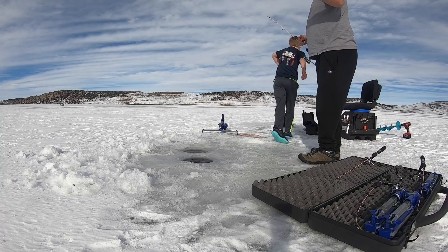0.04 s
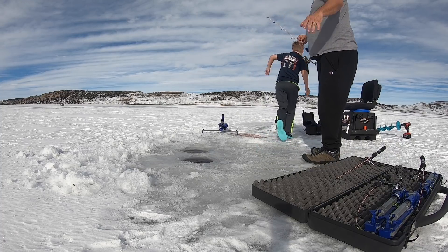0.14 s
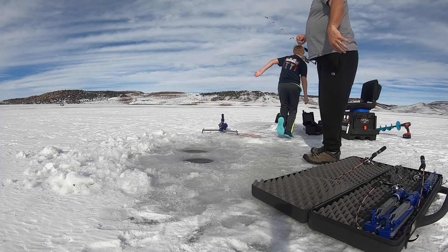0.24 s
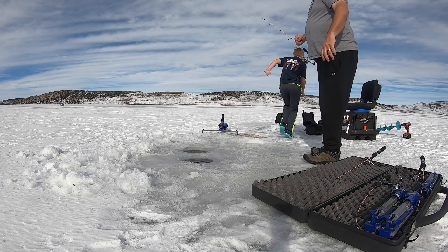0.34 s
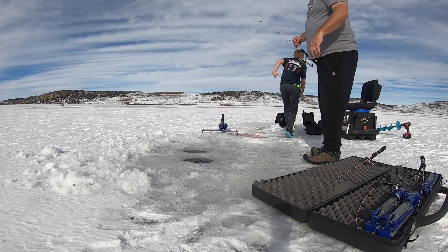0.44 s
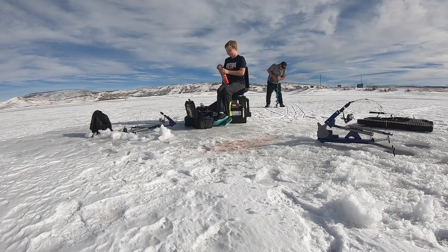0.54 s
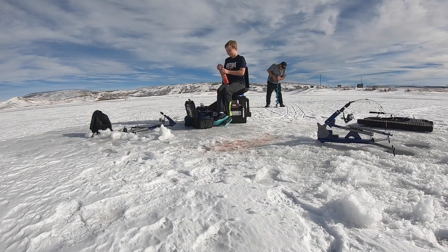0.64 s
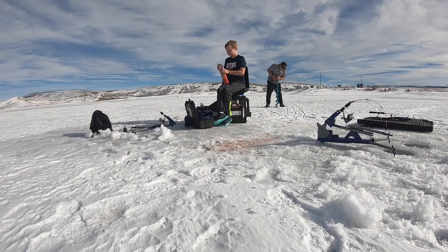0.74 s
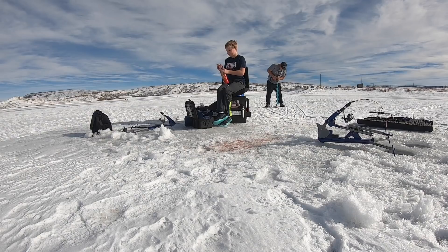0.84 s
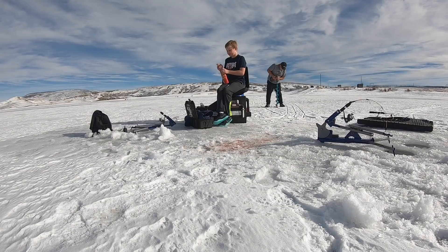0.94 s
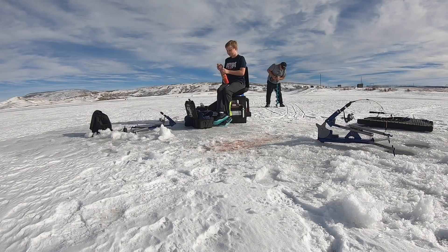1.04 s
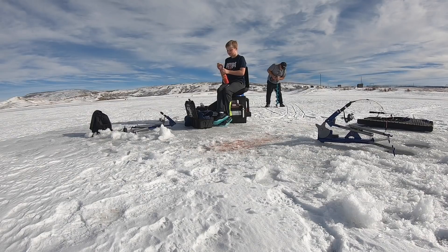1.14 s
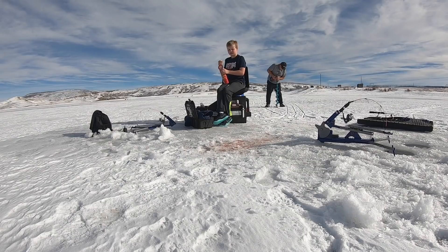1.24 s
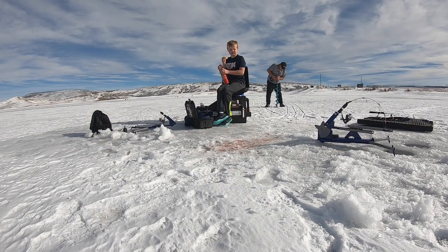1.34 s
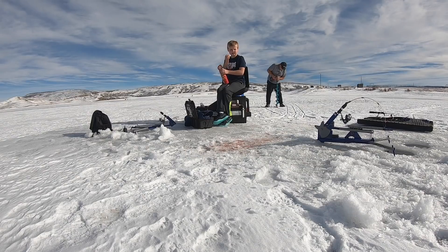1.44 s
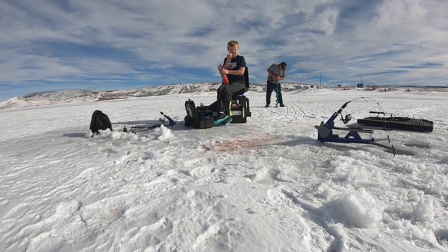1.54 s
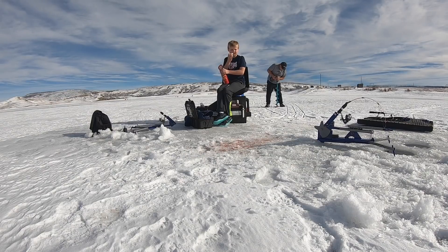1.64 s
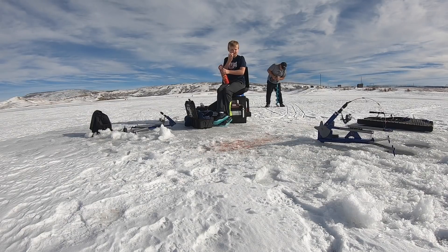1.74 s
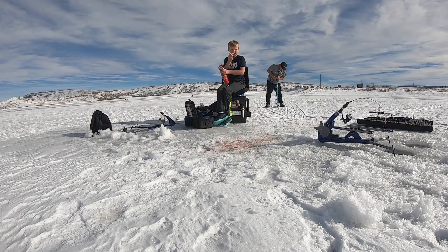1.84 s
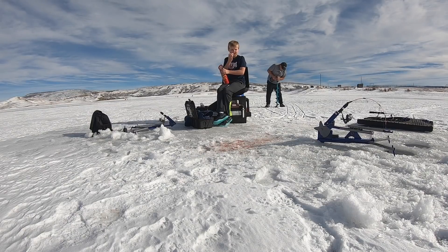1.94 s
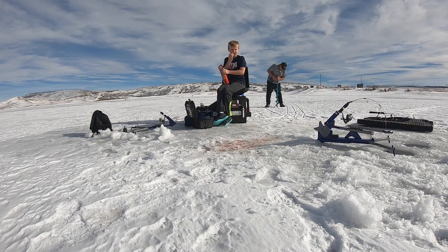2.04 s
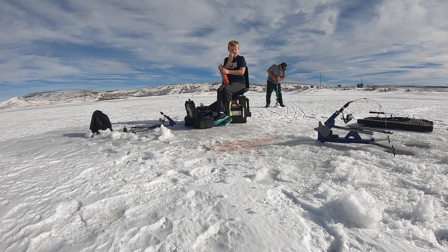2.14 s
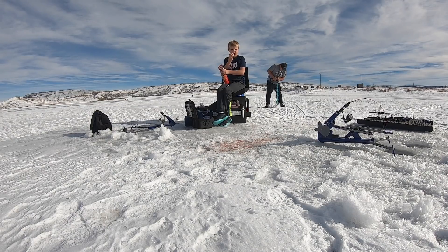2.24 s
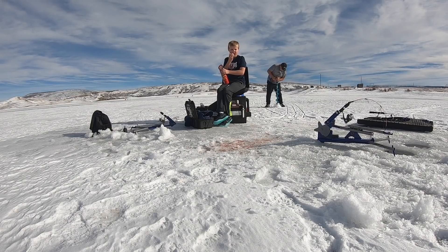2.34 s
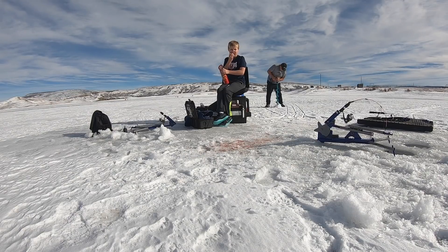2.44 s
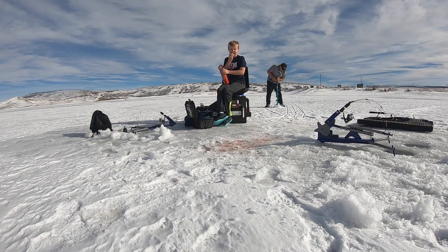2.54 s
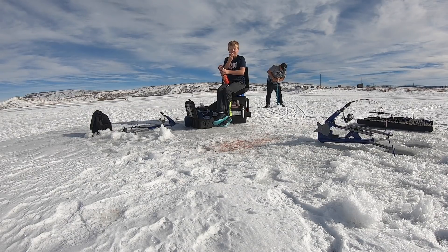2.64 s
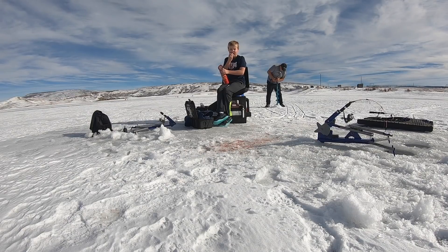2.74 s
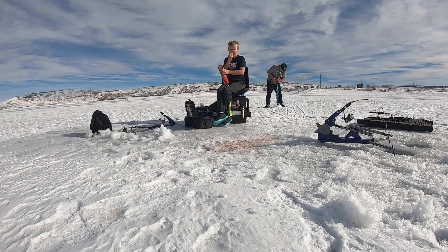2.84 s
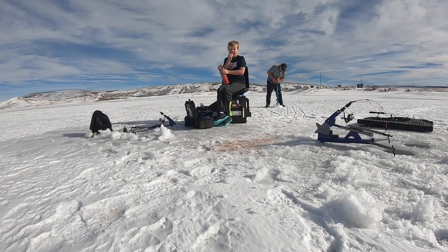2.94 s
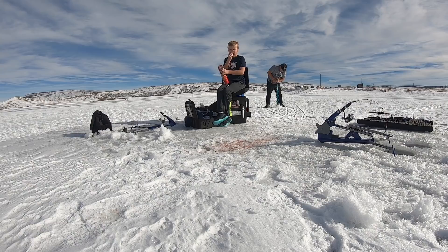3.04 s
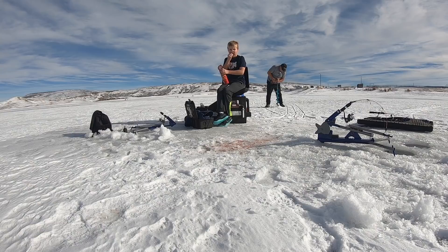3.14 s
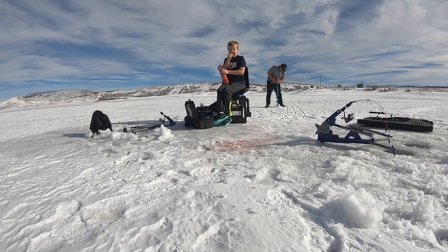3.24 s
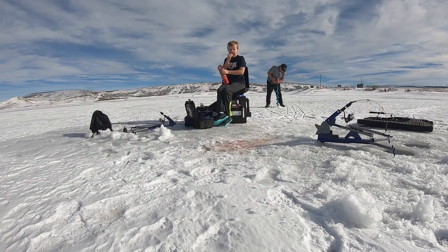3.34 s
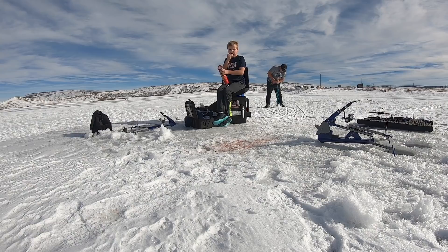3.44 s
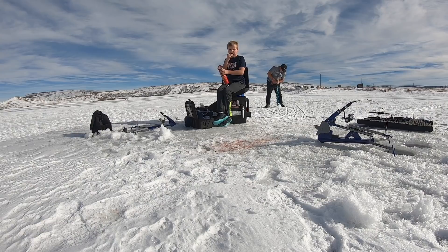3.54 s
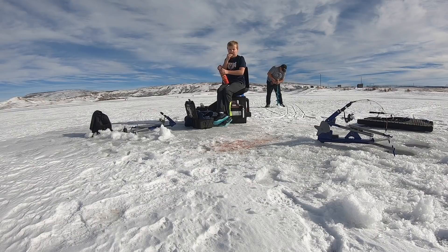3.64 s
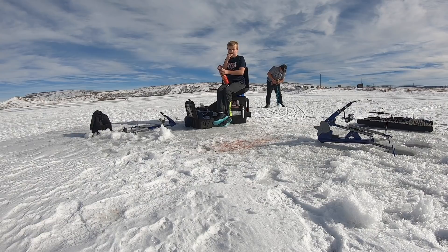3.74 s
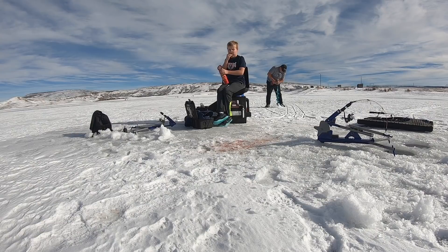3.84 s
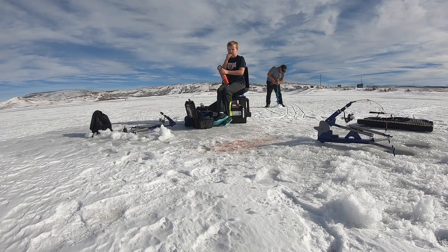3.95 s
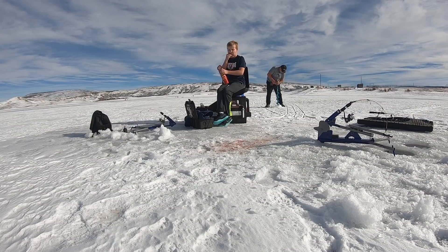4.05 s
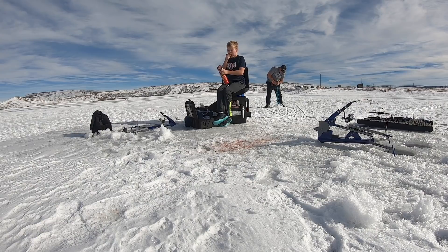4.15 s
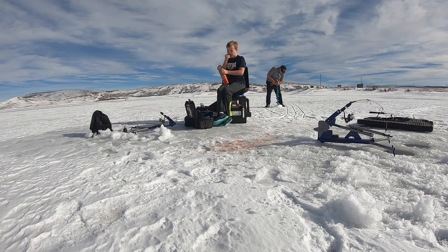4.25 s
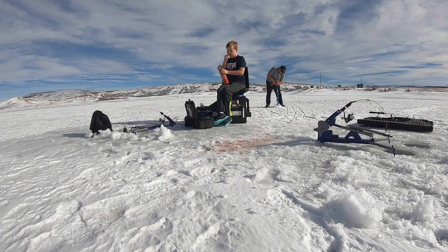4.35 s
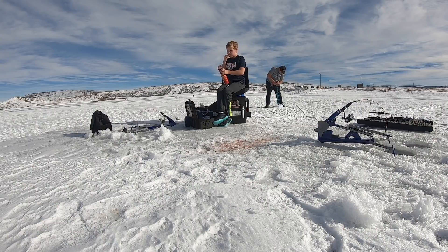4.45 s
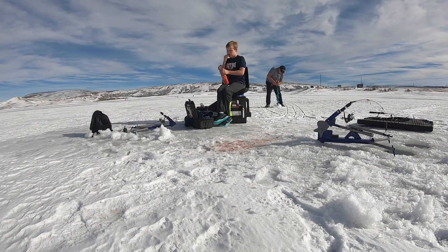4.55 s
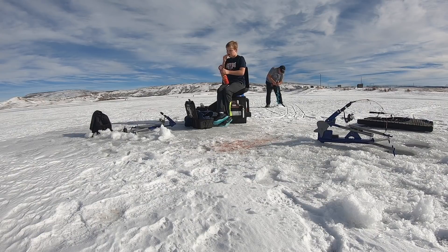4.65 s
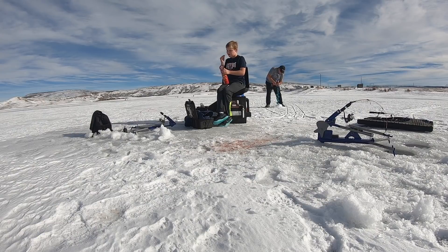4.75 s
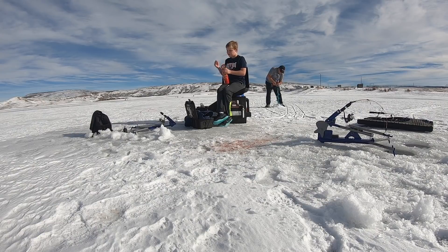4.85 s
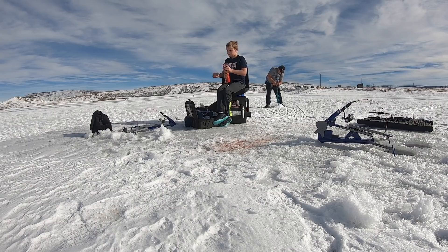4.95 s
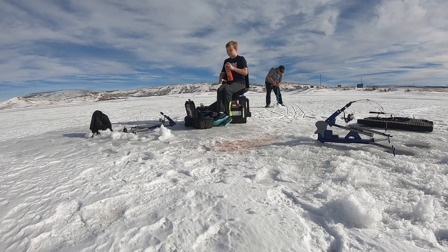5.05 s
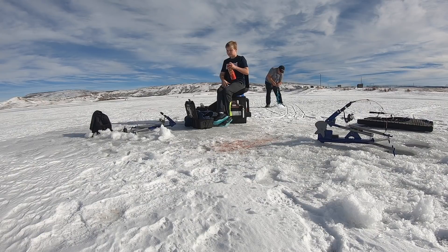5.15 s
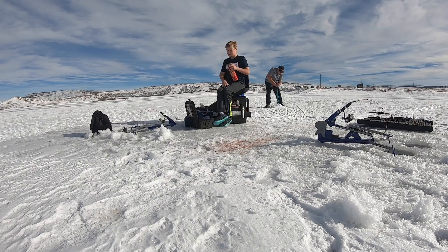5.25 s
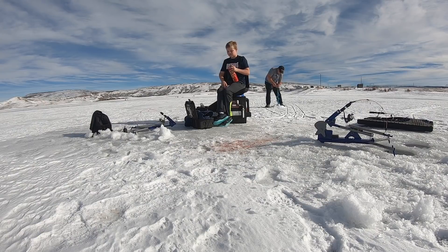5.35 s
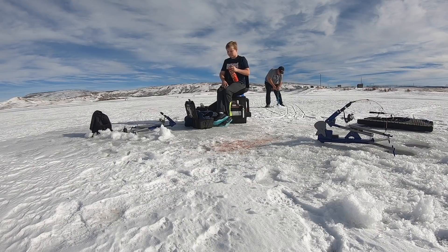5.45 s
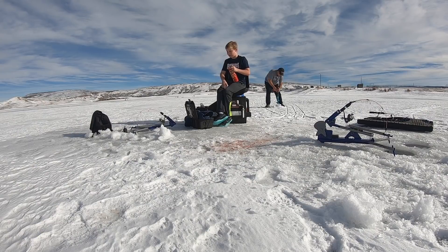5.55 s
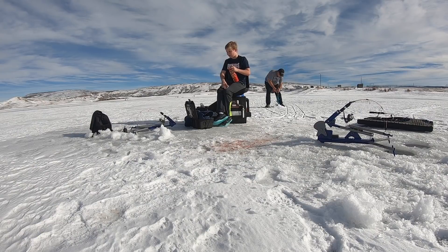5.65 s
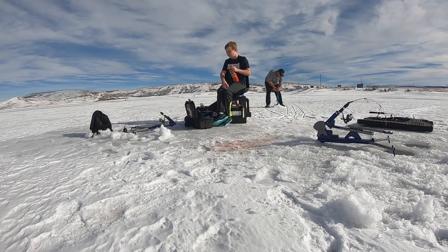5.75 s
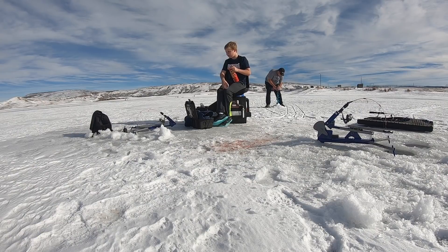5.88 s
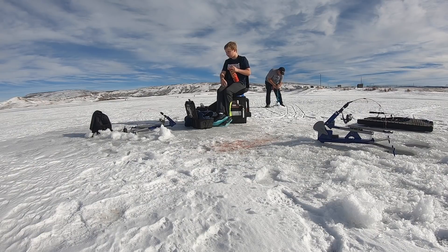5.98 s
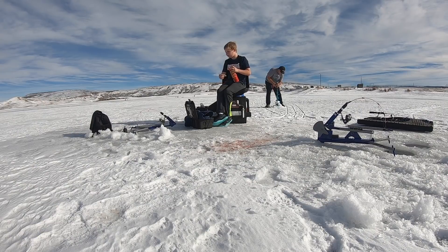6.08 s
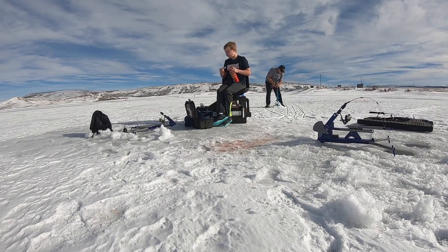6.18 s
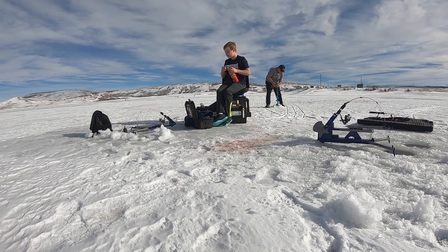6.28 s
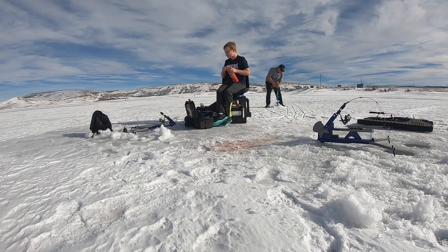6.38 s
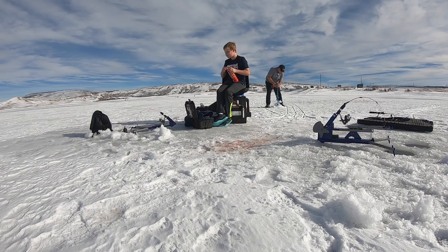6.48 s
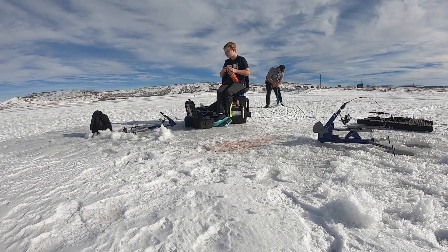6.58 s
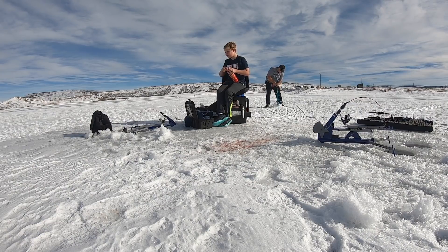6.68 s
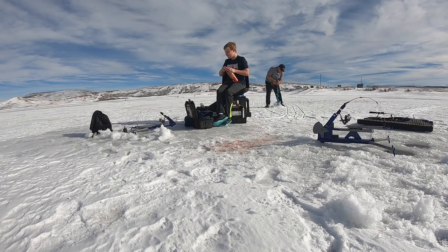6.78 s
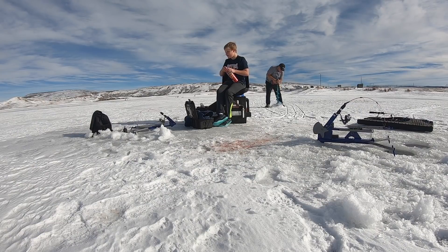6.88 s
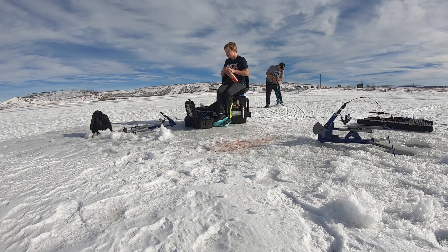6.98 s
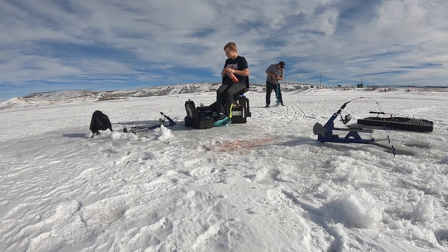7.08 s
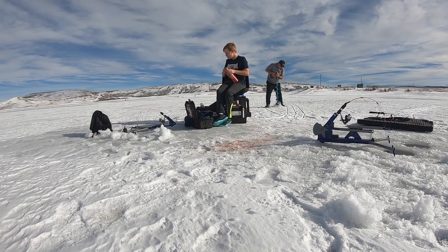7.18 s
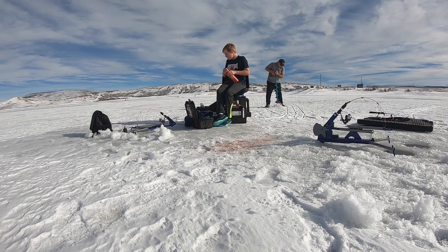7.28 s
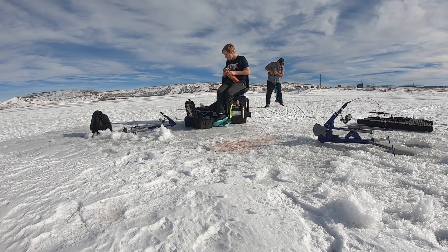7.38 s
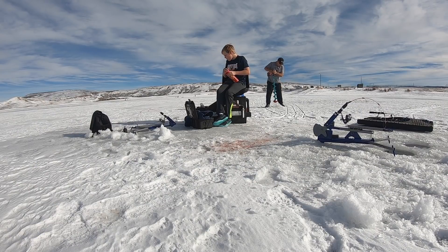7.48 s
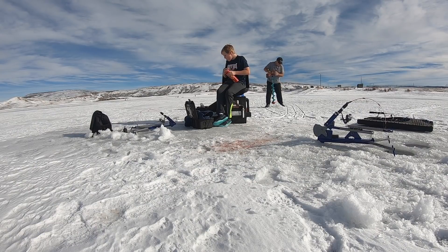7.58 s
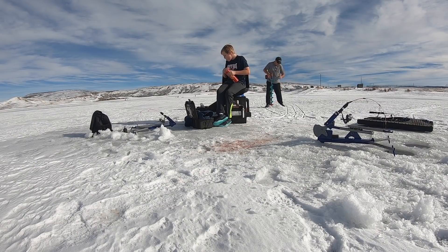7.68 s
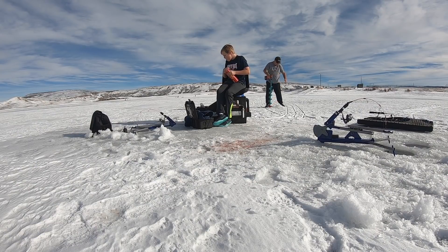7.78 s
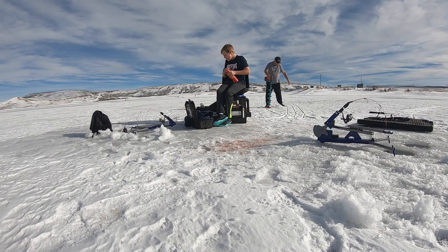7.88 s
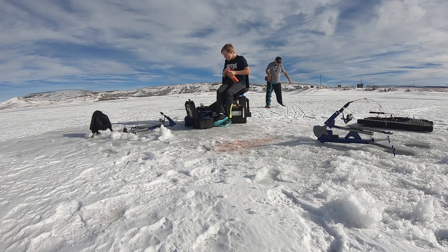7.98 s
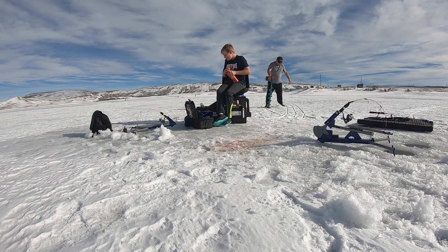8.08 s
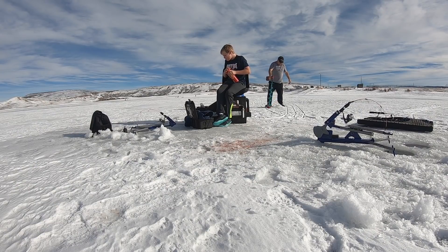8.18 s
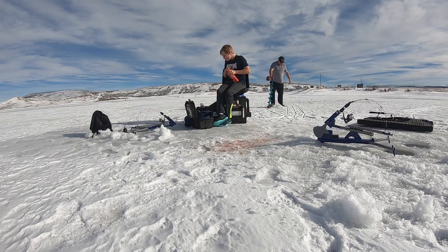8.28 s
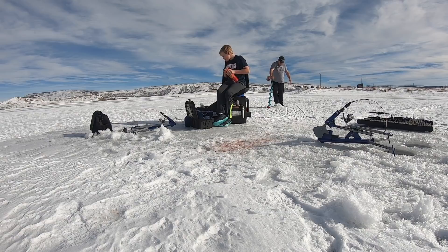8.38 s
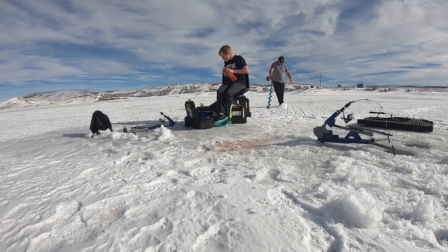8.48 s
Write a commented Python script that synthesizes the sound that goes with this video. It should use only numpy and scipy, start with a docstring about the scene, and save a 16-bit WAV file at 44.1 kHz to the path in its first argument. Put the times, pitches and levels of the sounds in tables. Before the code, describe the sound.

A drill-driven ice auger rises to a loud, rasping whine, breaks through, brakes sharply, then gives one short watery burst before quiet scuffs in light wind.

```python
"""A frozen lake in light wind: boots crunch on crusted snow, then a cordless drill turns an ice auger.
Shaft orders of motor and gears whine through the shell's resonances while shaped noise grains shave ice;
a bright hiss fades as the drilling deepens, the blades break through, the motor brakes and its lock clacks.
A second, short burst churns slush and water: gliding sines glug, then the motor winds down.
Decaying knocks, grainy scuffs and soft rubs follow, over filtered noise for the open air."""
import sys
import numpy as np
from scipy import signal
from scipy.fft import rfft, irfft, next_fast_len
from scipy.io import wavfile
from scipy.ndimage import uniform_filter1d

SR = 44100
rng = np.random.default_rng(int(sys.argv[2]) if len(sys.argv) > 2 else 0)


def dump_mix(stems):
    """Bounce the given channels to the path in sys.argv[1] as a 16-bit WAV at rate SR."""
    frames = np.atleast_2d(stems).T  # one column per channel
    limited = np.clip(frames, -1, 1)  # hard clip at full scale
    pcm = np.round(limited * 32767).astype(np.int16)
    wavfile.write(sys.argv[1], SR, pcm)


N = 375713
T = np.arange(N) / SR  # time in seconds
FREQS = np.maximum(np.fft.rfftfreq(N, 1 / SR), 1)

# Motor speed while drilling the hole. Each row: time in s, shaft speed in turns per second (Hz).
DRILLING = [(1.49, 40), (1.53, 60), (1.78, 59), (1.85, 88), (1.88, 104), (1.9, 119), (1.94, 160),
            (1.975, 186), (2.03, 185), (2.06, 201), (2.08, 219), (2.13, 288), (2.17, 311), (2.22, 320),
            (2.58, 318), (2.76, 386), (3.35, 373), (3.55, 408), (3.9, 416), (4.83, 411), (4.92, 420),
            (5.04, 411), (5.11, 427), (5.26, 422), (5.37, 433), (5.415, 378), (5.475, 414), (5.575, 414),
            (5.625, 378), (5.655, 268), (5.677, 180), (5.71, 60)]
# Motor speed while clearing the hole. Each row: time in s, shaft speed in turns per second (Hz).
CLEARING = [(6.345, 60), (6.383, 170), (6.395, 226), (6.405, 275), (6.418, 360), (6.45, 384), (6.5, 406),
            (6.54, 400), (6.58, 362), (6.75, 325), (6.8, 295), (6.85, 272), (6.93, 204), (7.0, 165),
            (7.05, 140), (7.13, 122), (7.47, 35)]
FULL_HZ = 400  # full motor speed
SINK_S, SINK_TIME_S, THROUGH_S = 2.86, 0.93, 5.41  # blades sink in, time constant of depth, break through
BREAK_DB, BREAK_LENGTH_S = 4, 0.015  # surge as the last ice gives way
UNLOAD_S = 0.04  # the load falls off this long before the blades are through
SLUSH_LOAD = 0.45  # load on the motor in slush, as a share of that in solid ice

# Tones of rotor, cogging and gear mesh.
# Each row: multiple of the shaft rate, gain in dB running free, gain in dB under load.
ORDERS = [(1, 1, -19), (2, -9, -17), (4, -3.5, -12), (8, -4, -15), (9, -21, 0), (13, 0, 2.5), (16, -5, -8),
          (18, -14, -9), (24, -5, 2), (48, -10, 4)]
# Resonances of the drill's shell. Each row: centre in Hz, width in Hz, gain in dB.
HOUSING = [(2930, 300, 15), (3930, 420, 11)]
# Shell resonance that fades under load. One row: centre in Hz, width in Hz, gain in dB.
FREE_RING = (5380, 250, 9)
# Pass band of the shell. One row: lower corner in Hz, upper corner in Hz.
SHELL_BAND_HZ = (250, 5200)
FINE_ORDER, FINE_TOP_HZ = 20, 3800  # orders above this one fade out past this frequency
BRAKE_DB, BRAKE_HZ_PER_S, BRAKE_ORDER = -13, 2000, 8  # fast slowing weakens every order but the cogging
# A change of speed drives the shell harder around this centre; a hard start adds a kick.
STRAIN_DB, STRAIN_HZ_PER_S, STRAIN_CENTRE_HZ, STRAIN_WIDTH_HZ = 13, 950, 2700, 1200
KICK_DB, KICK_HZ_PER_S = 9, 4800
# Hard grinding in the ice. One row: onset in s, full in s, easing in s, gone in s.
GRIND_S = (2.64, 2.85, 4.1, 4.85)
# Loading by the slush. One row: onset in s, full in s, easing in s, gone in s.
PLUNGE_S = (6.54, 6.6, 6.74, 6.8)
GRIND_DB, GRIND_JITTER_RAD = -3.5, 0.6  # both dim the whine and roughen its phase
SWITCH_HZ, SWITCH_ORDER, SWITCH_DB = 7560, 4, -71.5  # speed control: switching rate plus a shaft order

# Gain laws of whine, fan, rasp, hiss, scrape, spray and drone at full speed.
# Each row: dB on the surface, dB deep in the ice, dB spinning free, dB in slush, dB per doubling of speed.
WHINE_LAW = (-51.5, -54, -51, -55, 6)
FAN_LAW = (-83, -77, -49, -53, 9)
RASP_LAW = (-33.5, -38.5, -45, -48, 6)
HISS_LAW = (-41, -54, -65, -54, 10)
SCRAPE_LAW = (-45.5, -48, -51, -45.5, 7.5)
SPRAY_LAW = (-60.5, -45.5, -61, -57, 6)
DRONE_LAW = (-48, -48, -55, -58.5, 1.5)

# Spectrum of the cooling fan. Each row: frequency in Hz, relative density in dB per Hz.
FAN = [(2000, -30), (4600, -31), (5800, 4), (6600, 2), (7500, -11), (8600, -20), (11000, -27.5),
       (14000, -46)]
# Spectrum of the rasp. Each row: frequency in Hz, relative density in dB per Hz.
RASP = [(1150, -19.5), (1860, -7.5), (2260, -2.5), (2720, 3), (3220, 2), (3920, -4), (4620, -12),
        (5380, -12.5), (6050, -58), (9100, -35)]
# Spectrum of a bright hiss at part trigger, fading as the drilling deepens.
# Each row: frequency in Hz, relative density in dB per Hz.
HISS = [(600, -19), (1130, 13), (1700, 3), (2800, -8), (4100, -11.5), (5400, 0.5), (5950, -17), (6700, -9),
        (7500, -4), (8800, -13), (10500, -23), (14500, -35)]
# Spectrum of blades scraping. Each row: frequency in Hz, relative density in dB per Hz.
SCRAPE = [(102, -28), (222, 7), (312, -2), (452, 0), (652, 3.5), (905, 0), (1255, -1), (1710, -11),
          (3020, -5), (6100, -27.5)]
# Spectrum of the spraying chips. Each row: frequency in Hz, relative density in dB per Hz.
SPRAY = [(3550, -38), (5350, 4), (6350, 4.5), (7020, 0), (7680, 1.5), (8820, -11), (9820, -4.5),
         (11250, -27.5), (12550, -22), (14600, -47)]
# Spectrum shared by drone and wind rumble. Each row: frequency in Hz, relative density in dB per Hz.
RUMBLE_COLOUR = [(26, -61), (62, -36), (107, -24.5), (142, -0.5), (166, 3.5), (196, 0), (232, -4.5),
                 (292, -11.5), (510, -61)]
# Resonances of auger and drill. Each row: centre in Hz, width in Hz, strength in dB.
AUGER = [(441, 23.4, 26), (616, 200, 17), (1298, 34, 19.5), (1957, 19, 21), (2202, 120, 18),
         (2930, 210, 3.5), (3400, 100, -3)]
# The blades bite into the ice. Each row: centre in s, half length in s,
# swell in dB of the scrape, of the rasp, of the spray.
CATCHES = [(2.37, .03, 7, 0, 0), (2.575, .04, 10, 3.5, 3), (2.78, .055, 7, 1.5, 0),
           (2.915, .04, 11, 2.5, -2), (3.12, .06, 9, .5, 0), (3.29, .055, 11, 1, 0), (3.46, .04, 13, 1, 1),
           (3.61, .032, 8.5, 2.5, 1), (3.76, .038, 12.5, 4, 2.5), (3.92, .07, 8.5, 1.5, 3.5),
           (4.08, .024, 12, 3, 2.5), (4.14, .027, 11.5, 5, 7), (4.245, .028, 11.5, 1.5, 2),
           (4.315, .022, 6, 1, 0), (4.57, .025, 6.5, 0, 1), (4.735, .022, 10, 5, 0),
           (4.91, .035, 8, 2.5, 0), (4.98, .022, 3.5, 3, 5.5), (5.075, .022, 2, 4.5, 1),
           (5.145, .028, 4, 3, 3)]
# Growth of the grip. One row: blades start to bite in s, bite fully in s.
GRIP_S = (1.52, 2.75)
SLIP_DB = -6  # less scrape before the blades grip
HISS_DIP_S, HISS_DIP_LENGTH_S, HISS_DIP_DB = 3.17, 0.17, -3.5  # the hiss and spray dip for a moment
SLUSH_GRAIN_DB, SLOSH_DB = 2.8, 2.2  # spread of the lumps' sizes; uneven sloshing

# The spindle lock clacks as the motor stops. Each row: start in s, level in dB.
CLACKS = [(5.668, -33), (5.675, -26.5), (5.6892, -27), (5.6976, -29)]
CLACK_T60_S, SHELL_T60_S, SHELL_RING_DB = 0.032, 0.29, -21.5
# Spectrum of the rattling shell. Each row: frequency in Hz, relative density in dB per Hz.
RATTLE = [(300, -19), (1900, -12.5), (2600, 3.5), (3050, 2.5), (3600, -0.5), (4400, -19.5), (7500, -19.5),
          (10500, -42), (14000, -58)]
INRUSH_S, INRUSH_LENGTH_S, INRUSH_DB = 6.352, 0.084, -42.5  # buzz as the trigger is snatched
# The stalled motor sings under a half-pulled trigger. Each row: centre in Hz, width in Hz, level in dB.
CREEP = [(1750, 110, -69), (2360, 70, -73), (3200, 350, -66)]
# Span of that singing. One row: start in s, end in s.
CREEP_S = (1.22, 1.39)

# The loudest glugs in the hole.
# Each row: start in s, pitch in Hz, peak in dB, length in s (5 ms at least), glide in octaves.
BUBBLES = [(5.928, 271, -46, 0.042, -0.1), (6.101, 226.5, -35.5, 0.043, 0.3), (6.372, 191, -38, 0.02, 0.46),
           (6.397, 596, -42.5, 0.028, -0.019), (6.455, 218, -35, 0.027, 0.24),
           (6.567, 494, -41.5, 0.034, 0.023), (6.613, 424, -38, 0.049, 0.18),
           (6.643, 497, -24.5, 0.041, -0.26), (6.719, 717, -38, .028, 0.018),
           (6.736, 241, -37, 0.038, -0.66), (6.811, 637, -39.5, 0.039, -0.28),
           (6.845, 477, -32.5, 0.059, -0.53), (6.891, 332, -38.5, 0.065, 0.28),
           (6.922, 376, -42.5, 0.059, 0.53), (6.997, 680, -45.5, .035, -0.17),
           (7.022, 465, -44.5, 0.04, -0.025), (7.111, 384, -41.5, 0.035, 0.024),
           (7.172, 425, -44.5, 0.06, -0.0078), (7.29, 890, -52.5, .022, -0.21),
           (7.502, 593, -52, 0.02, 0.021), (7.829, 830, -43, 0.0042, -1)]
# Small glugs stirred up by the auger: span, pitch range, peak, length.
CHURN_S, CHURN_HZ, CHURN_DB, CHURN_GLUG_S = (6.5, 7.2), (330, 1100), -46, 0.016
# Spectrum of water fizzing through slush. Each row: frequency in Hz, relative density in dB per Hz.
FIZZ = [(1500, 8.5), (4300, 5.5), (7000, -7.0), (10000, -13.0), (14500, -45)]
SEEP_DB = -67.5  # level of the fizz once the hole is open

# Blows of the auger, ice lumps and gear.
# Each row: start in s, level in dB, thud in dB over it, crack in dB over it, decay time t60 in s.
BLOWS = [(1.221, -54.5, 7, -8, 0.1), (5.376, -26, -10, -5, 0.058), (5.403, -29, -10, -5, 0.11),
         (5.698, -37, 0, -16, 0.12), (5.779, -42.5, -8, -13.5, 0.073), (6.026, -39, -10, -26, 0.11),
         (6.068, -52, -25, -2, .05), (6.123, -31.5, -3, -16.5, 0.092), (6.462, -34, -12, -7, 0.24),
         (6.609, -31, -8, -6.5, 0.1), (6.646, -31.5, -16, -5, .12), (6.685, -30, -21, -4.5, 0.07),
         (6.723, -30.5, -18, -7.5, 0.081), (6.752, -33, -17, -5.5, 0.074), (6.79, -37.5, -18, -2.5, 0.099),
         (6.861, -31.5, -22, -4.5, 0.15), (6.893, -32.5, -22, -4, 0.24), (7.004, -43.5, -14, -1.5, 0.2),
         (7.128, -44.5, -18, 3.5, 0.029), (7.173, -37.5, -15, -8, 0.086), (7.19, -49, -25, -11, .06),
         (7.278, -61, -20, 4, 0.055), (7.369, -49.5, -25, 5, 0.028), (7.697, -31, -0.5, 4, 0.023),
         (7.709, -39.5, -4, -2, 0.06)]
# Spectrum of a crack. Each row: frequency in Hz, relative density in dB per Hz.
CRACK = [(60, -42), (910, -2.0), (2020, 8.0), (3320, 5.0), (4820, -0.5), (7020, 1.0),
         (11000, -20.5), (14100, -48)]
# Spectrum of a hollow clonk. Each row: frequency in Hz, relative density in dB per Hz.
CLONK = [(45, -48), (122, -13.0), (305, 4.5), (1310, -15.5), (3020, -14.0), (8100, -78)]
CRACK_RATE_HZ, CRACK_GRAIN_DB, CRACK_ATTACK_S = 6000, 1.5, 0.0004  # a cluster of tiny fractures
CHIP_HZ, CHIP_WIDTH_HZ, CHIP_DB = (900, 4200), 260, 10  # each lump rings at its own few pitches
THUD_T60_S = 0.1

# Boots and gear scuffing crusted snow.
# Each row: start in s, length in s, level in dB, treble tilt in dB per octave.
CRUNCHES = [(0.0, 0.06, -59.5, 2.5), (0.051, 0.15, -48.5, 2), (0.094, 0.038, -40.5, 1),
            (0.171, 0.28, -64.5, 0.5), (0.178, 0.084, -54.5, 1), (0.51, 0.023, -50.5, 2),
            (0.53, 0.032, -46.5, 0.5), (5.938, 0.036, -61, -1), (5.979, 0.022, -58, -0.5),
            (7.864, 0.122, -62.5, 4), (7.91, 0.017, -50, 7), (7.927, 0.024, -47, 2),
            (8.249, 0.23, -58, 2.5), (8.432, 0.097, -53.5, 3)]
# Spectrum of the snow crust. Each row: frequency in Hz, relative density in dB per Hz.
CRUST = [(100, -10), (300, -1), (1200, 0), (2300, 0), (3500, -5), (5000, -10), (8100, -18), (11100, -28),
         (14800, -45)]
SCUFF_PAN_DB = -5  # left minus right
# Swishes and bumps of gear and clothing.
# Each row: start in s, length in s, centre in Hz, width in Hz, level in dB.
RUBS = [(0.2, 0.048, 354, 220, -49.5), (0.534, 0.043, 1440, 1100, -46.5), (0.557, 0.013, 1600, 900, -48),
        (1.386, 0.14, 1670, 920, -64), (7.932, 0.013, 1400, 600, -50.5), (8.466, 0.014, 965, 600, -47.5)]
# A short rubbing squeak. One row: start in s, pitch in Hz, peak in dB, length in s, glide in octaves.
SQUEAK = (7.921, 2080, -42, .045, .22)

# Spectrum of the open air. Each row: frequency in Hz, relative density in dB per Hz.
AIR = [(31, -9), (255, 1), (455, -5.5), (810, -3.5), (1110, -6.5), (1710, -4.5), (3220, -5.5), (4020, -15),
       (5020, -16.5), (6600, -27), (10200, -32), (14200, -49)]
# Fixed resonances in the air. Each row: centre in Hz, width in Hz, strength in dB.
AIR_RINGS = [(826, 47, 14.7), (1535, 63, 17.6), (1734, 48, 18), (1872, 52, 5.7), (2414, 240, 11)]
AIR_DB = -68.5
WIND_DB, GUST_DB = -63, 0.5  # low rumble and its wander
# Gusts in the rumble. Each row: centre in s, half length in s, swell in dB.
GUSTS = [(0.77, .12, 7), (1.14, 0.13, 7.5), (7.623, .06, 4.5)]
# Swells of a low hum. Each row: start in s, length in s, level in dB.
HUM_SWELLS = [(2.885, 0.48, -61), (3.95, .3, -70), (4.55, 0.56, -62.5), (7.693, 0.41, -67)]
HUM_HZ, HUM_ATTACK_S, HUM_RELEASE_S, HUM_FLOOR_DB = 83.6, 0.048, 0.43, -81.5
FAR_TONE_HZ, FAR_TONE_WIDTH_HZ, FAR_TONE_DB = 2456, 136, -69  # a faint, distant whistling tone

# A short silence. One row: start in s, end in s.
DROPOUT = (0.567, 0.669)
# Share of the sound that spreads sideways. Each row: frequency in Hz, gain in dB.
WIDTH = [(60, -0.5), (110, -23.5), (200, -15), (380, -19), (700, -12), (1290, -18.5), (2380, -48),
         (4400, -13), (8120, 4.5), (15000, -1)]
# Narrow stereo image. One row: narrow from in s, starts to widen in s, open again in s.
NARROW_S = (.65, 2.85, 5.55)
TOP_HZ = 14900  # low-pass corner


def drill():
    """Principle of a common drive: one motor speed, in two pulls of the trigger, rules whine and auger."""
    hz = np.interp(T, *np.transpose(DRILLING + CLEARING))
    running = 0
    for run in (DRILLING, CLEARING):
        start, end = run[0][0], run[-1][0]
        running = running + ramp(start, start + 0.053) - ramp(end - 0.012, end)
    accel = uniform_filter1d(np.gradient(hz) * SR, size=600)
    whine, turn = motor(hz, accel)
    return running * (whine + auger(hz, turn)) + gearbox()


def motor(hz, accel):
    """Principle of order tracking: shaft harmonics flare on crossing resonances; load shifts their balance."""
    load = 1 - ramp(THROUGH_S - UNLOAD_S, THROUGH_S) + SLUSH_LOAD * (T > CLEARING[0][0])
    drag = cutting() * ramp(GRIND_S[0], GRIND_S[1])
    grind = sum(np.interp(T, span, [0, 1, 1, 0]) for span in (GRIND_S, PLUNGE_S))
    brake = np.clip(-accel / BRAKE_HZ_PER_S, 0, 1) ** 2
    flare_db = STRAIN_DB * np.tanh((accel / STRAIN_HZ_PER_S) ** 2)
    flare_db = flare_db + KICK_DB * np.clip(accel / KICK_HZ_PER_S, 0, 1) ** 2
    hz = hz * (1 + (0.002 + 0.004 * drag) * walk(36))  # unsteady speed
    turn = 2 * np.pi * np.cumsum(hz) / SR  # shaft angle in radians
    whine = np.zeros(N)
    for order, free_db, loaded_db in ORDERS:
        f = order * hz
        power = 1 + sum(np.abs(resonance(f, *ring)) ** 2 for ring in HOUSING)
        power = power + (1 - load) * np.abs(resonance(f, *FREE_RING)) ** 2
        shell = power ** 0.5
        if order > FINE_ORDER:
            shell = shell / (1 + (f / FINE_TOP_HZ) ** 6)
        shell = shell / (1 + (SHELL_BAND_HZ[0] / f) ** 2 + (f / SHELL_BAND_HZ[1]) ** 4)
        db = free_db + load * (loaded_db - free_db)
        db = db + flare_db * np.abs(resonance(f, STRAIN_CENTRE_HZ, STRAIN_WIDTH_HZ, 0)) ** 2
        db = db + BRAKE_DB * brake * (order != BRAKE_ORDER)
        db = db + (1.5 + 1.5 * drag) * walk(75)
        jitter = (0.28 + 0.15 * drag + GRIND_JITTER_RAD * grind) * walk(210)
        whine += shell * undb(db) * np.sin(order * turn + jitter)
    whine = whine * loudness(WHINE_LAW, hz) * undb(GRIND_DB * grind)
    # the switching tone is heard until the blades sink in
    switching = undb(SWITCH_DB) * np.sin(2 * np.pi * SWITCH_HZ * T + SWITCH_ORDER * turn) * (T < SINK_S)
    fan = colour(rng.standard_normal(N), FAN) * loudness(FAN_LAW, hz)
    return whine + switching + fan, turn


def auger(hz, turn):
    """Principle of brittle fracture: jerky bites ring the auger; rasp, hiss, spray and drone are noise layers."""
    grip = ramp(*GRIP_S)
    scrape_db, rasp_db, spray_db = sum(
        np.outer(swell_db, np.exp(-((T - s) / length) ** 2)) for s, length, *swell_db in CATCHES)
    hiss_dip_db = HISS_DIP_DB * np.exp(-((T - HISS_DIP_S) / HISS_DIP_LENGTH_S) ** 2)
    jerk = walk(48)  # one unsteadiness shared by rasp, hiss, scrape and spray
    rasp = colour(chips(12000) * (1 + 0.052 * np.sin(turn)), RASP, AUGER)
    rasp = rasp * loudness(RASP_LAW, hz) * undb(rasp_db + 0.57 * jerk)
    hiss = colour(chips(9000), HISS) * loudness(HISS_LAW, hz) * undb(hiss_dip_db + 0.95 * jerk)
    scrape = colour(chips(2900), SCRAPE, AUGER) * loudness(SCRAPE_LAW, hz)
    scrape = scrape * undb(scrape_db + SLIP_DB * (1 - grip) + 1.3 * jerk)
    spray = colour(chips(7500), SPRAY) * loudness(SPRAY_LAW, hz)
    spray = spray * undb(spray_db + hiss_dip_db + 0.56 * jerk)
    drone = colour(rng.standard_normal(N), RUMBLE_COLOUR) * loudness(DRONE_LAW, hz)
    return rasp + hiss + scrape + spray + drone


def gearbox():
    """Principle of impact excitation: the lock's clacks ring the shell; trigger buzz and song are noise bands."""
    out, t = np.zeros(N), T[:8192]
    for s, db in CLACKS:
        clack = colour(rng.standard_normal(len(t)), RATTLE)
        clack = clack * undb(-60 * t / CLACK_T60_S) * np.tanh(t / CRACK_ATTACK_S) ** 2
        ring_hz = HOUSING[0][0] * rng.uniform(0.99, 1.03)
        ring = np.sin(2 * np.pi * ring_hz * t) * undb(-60 * t / SHELL_T60_S)
        add(out, s, undb(db) * (clack + undb(SHELL_RING_DB) * ring))
    n = int(INRUSH_LENGTH_S * SR)
    buzz = colour(rng.standard_normal(n), RATTLE) * signal.windows.tukey(n, 0.1)
    add(out, INRUSH_S, undb(INRUSH_DB) * buzz)
    n = int((CREEP_S[1] - CREEP_S[0]) * SR)
    song = sum(undb(db) * band(n, f, w) for f, w, db in CREEP)
    add(out, CREEP_S[0], song * signal.windows.tukey(n, 0.4))
    return out


def cutting():
    """Principle of contact: 1 until the blades break through the solid ice, 0 soon after."""
    return 1 - ramp(THROUGH_S, THROUGH_S + 0.044)


def loudness(law, hz):
    """Principle of a power law: a layer's gain follows motor speed and the medium around the blades."""
    surface_db, deep_db, free_db, slush_db, speed_db = law
    depth = 1 - np.exp(-np.maximum(T - SINK_S, 0) / SINK_TIME_S)
    surge_db = BREAK_DB * np.exp(-((T - THROUGH_S) / BREAK_LENGTH_S) ** 2)
    ice_db = surface_db + depth * (deep_db - surface_db) + surge_db
    open_db = np.where(T < CLEARING[0][0], free_db, slush_db)
    return undb(open_db + cutting() * (ice_db - open_db) + speed_db * np.log2(hz / FULL_HZ))


def chips(rate):
    """Principle of grain size: fine, even grains at first; sparser, sloshing lumps in slush."""
    fine = grit(N, rate, 0.27)
    lumps = grit(N, rate / 4, SLUSH_GRAIN_DB) * undb(SLOSH_DB * walk(45))
    return np.where(T < CLEARING[0][0], fine, lumps)


def water(count=24):
    """Principle of bubble resonance: glugs are short gliding tones; the open hole fizzes with tiny clicks."""
    out = colour(grit(N, 2800, 0.64), FIZZ) * undb(SEEP_DB) * (1 - cutting())
    for s, hz, db, length, glide in BUBBLES:
        add(out, s, undb(db) * chirp(hz, length, glide))
    for k, (when, pitch, glide) in enumerate(rng.random((count, 3))):
        s = np.interp(k + when, [0, count], CHURN_S)
        hz = np.interp(pitch, [0, 1], CHURN_HZ)
        add(out, s, undb(CHURN_DB) * chirp(hz, CHURN_GLUG_S, glide - 0.5))
    return out


def knocks():
    """Principle of modal decay: each blow is a gritty crack, a hollow clonk and a thud in the ice."""
    out, t = np.zeros(N), T[:8192]
    boom = undb(-60 * t / THUD_T60_S)
    for s, db, thud_db, crack_db, t60 in BLOWS:
        ring = undb(-60 * t / t60) * np.tanh(t / CRACK_ATTACK_S) ** 2
        lump = [(f, CHIP_WIDTH_HZ, CHIP_DB) for f in rng.uniform(*CHIP_HZ, size=3)]
        crack = undb(crack_db) * colour(grit(len(t), CRACK_RATE_HZ, CRACK_GRAIN_DB), CRACK, lump)
        clonk = undb(-6.5) * colour(rng.standard_normal(len(t)), CLONK)
        thud = np.sin(2 * np.pi * rng.uniform(144, 234) * t) * (1 - np.exp(-t / 0.00076))
        add(out, s, undb(db) * (ring * (crack + clonk) + boom * undb(thud_db) * thud))
    return signal.sosfilt(signal.butter(2, 90, "high", fs=SR, output="sos"), out)


def scuffs():
    """Principle of granular collapse: the snow crust gives way in a burst of grains."""
    out = np.zeros(N)
    for s, length, db, tilt_db in CRUNCHES:
        n = int(max(length, 0.005) * SR)
        tilted = [(f, d + tilt_db * np.log2(f / 2000)) for f, d in CRUST]
        grains = colour(grit(n, 5200, 1.5), tilted)
        add(out, s, undb(db) * grains * signal.windows.tukey(n, 0.42))
    return out


def handling():
    """Principle of friction: gear and clothing rub as bands of noise, and squeak once as a gliding tone."""
    out = np.zeros(N)
    for s, length, centre_hz, width_hz, db in RUBS:
        n = int(max(length, 0.005) * SR)
        add(out, s, undb(db) * band(n, centre_hz, width_hz) * signal.windows.tukey(n, 0.5))
    s, hz, db, length, glide = SQUEAK
    add(out, s, undb(db) * chirp(hz, length, glide))
    return out


def outdoors():
    """Principle of turbulence: thin air and fluttering rumble are filtered noise; a hum and far tone join."""
    air = colour(rng.standard_normal(N), AIR, AIR_RINGS) * undb(AIR_DB + 0.24 * walk(13))
    gusts_db = sum(db * np.exp(-((T - s) / length) ** 2) for s, length, db in GUSTS)
    rumble = colour(rng.standard_normal(N), RUMBLE_COLOUR)
    rumble = rumble * undb(WIND_DB + gusts_db + GUST_DB * walk(3.19))
    hum_gain = undb(HUM_FLOOR_DB)
    for s, length, db in HUM_SWELLS:
        release = np.exp(-np.maximum(T - s - length, 0) / HUM_RELEASE_S)
        hum_gain = hum_gain + undb(db) * ramp(s - HUM_ATTACK_S, s) * release
    hum = unit(np.sin(2 * np.pi * HUM_HZ * T + 1.34 * walk(21))) * hum_gain
    # the far tone is absent before the short silence
    tone = band(N, FAR_TONE_HZ, FAR_TONE_WIDTH_HZ) * undb(FAR_TONE_DB) * (T > DROPOUT[0])
    return air + rumble + hum + tone


def undb(db):
    """Definition of the decibel: level to amplitude gain."""
    return 10 ** (np.asarray(db) / 20)


def unit(x):
    """Normalisation to an rms of 1."""
    return x / np.sqrt(np.mean(x ** 2) + 1e-20)


def ramp(start, end):
    """Linear rise from 0 to 1 between two times."""
    return np.clip((T - start) / max(end - start, 0.001), 0, 1)


def walk(rate):
    """Low-passed chance: smooth random motion with rms 1."""
    k = max(int(SR / rate), 1)
    steps = np.repeat(rng.standard_normal(N // k + 1), k)[:N]
    return unit(uniform_filter1d(uniform_filter1d(steps, k), k))


def grit(n, rate, spread_db):
    """Random impulse train: tiny fractures, many weak clicks and a few strong ones."""
    size = undb(spread_db * np.minimum(rng.exponential(size=n), 5))
    return unit((rng.random(n) < rate / SR) * size * rng.standard_normal(n))


def gain_at(hz, points):
    """Gain of a spectrum given by points, interpolated in dB over log frequency."""
    f, db = np.transpose(points)
    return undb(np.interp(np.log(hz), np.log(f), db))


def resonance(hz, centre_hz, width_hz, db):
    """Damped oscillator: complex response of one mode."""
    return undb(db) / (1 + 1j * (hz ** 2 - centre_hz ** 2) / (hz * width_hz))


def colour(x, points, modes=()):
    """Source-filter principle: a broad spectrum and the modes that stand out of it, at rms 1."""
    n = next_fast_len(len(x), True)
    hz = np.maximum(np.fft.rfftfreq(n, 1 / SR), 1)
    rings = 2.0 + sum(resonance(hz, f, w, db) - resonance(hz, f, w, 0) for f, w, db in modes)
    return unit(irfft(rfft(x, n) * gain_at(hz, points) * rings, n)[:len(x)])


def band(n, centre_hz, width_hz):
    """Resonant filtering: noise through one mode applied twice, at rms 1."""
    hz = np.maximum(np.fft.rfftfreq(n, 1 / SR), 1)
    return unit(irfft(rfft(rng.standard_normal(n)) * resonance(hz, centre_hz, width_hz, 0) ** 2, n))


def chirp(hz, length, glide):
    """Gliding oscillator: a glug or squeak swells and dies; the pitch glides for the first half."""
    length = max(length, 0.005)
    age = T[:int(2 * length * SR)] / length
    phase = 2 * np.pi * np.cumsum(hz * 2 ** (glide * np.minimum(age, 1))) / SR
    swell = age ** 3 * np.exp(-8 * age)
    return swell / swell.max() * np.sin(phase)


def add(out, s, x):
    """Superposition: mix a sound in at time s."""
    i = int(np.clip(s * SR, 0, N - 1))
    out[i:i + len(x)] += x[:N - i]


def scene():
    """Principle of decorrelation: sources lie ahead, boots to the right; phase scatter spreads the image."""
    boots = scuffs()
    mid = drill() + knocks() + handling() + boots + water() + outdoors()
    scatter = rng.standard_normal(512) * np.hanning(512)
    scatter = np.exp(1j * np.angle(rfft(scatter, N)))  # phase only
    side = irfft(rfft(mid) * scatter * gain_at(FREQS, WIDTH), N)
    narrow = ramp(NARROW_S[0] - 0.05, NARROW_S[0]) - ramp(NARROW_S[1], NARROW_S[2])
    side = side * (1 - narrow * (1 - undb(-53)))
    pan = undb(SCUFF_PAN_DB)
    side = side + boots * (pan - 1) / (pan + 1)
    return np.array([mid + side, mid - side])


def record(dry):
    """Principle of gating and band-limiting: the sound drops out for a moment, and the top is cut."""
    start, end = DROPOUT
    gate = np.interp(T, [start, start + 0.006, end, end + 0.04], [1, 0, 0, 1])
    return signal.sosfilt(signal.ellip(8, 0.2, 70, TOP_HZ, fs=SR, output="sos"), dry * gate)


dry = scene()
out = record(dry)
dump_mix(out)
```